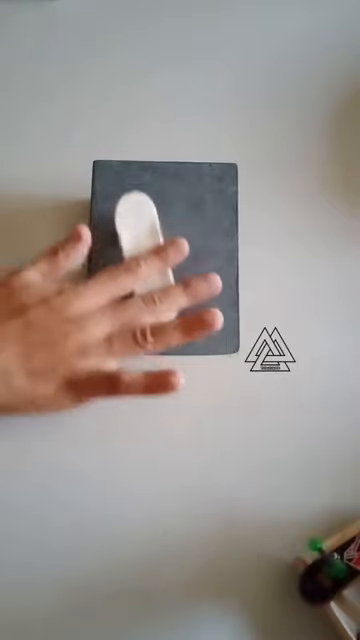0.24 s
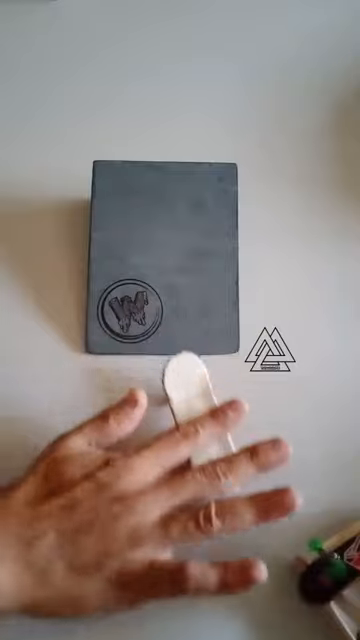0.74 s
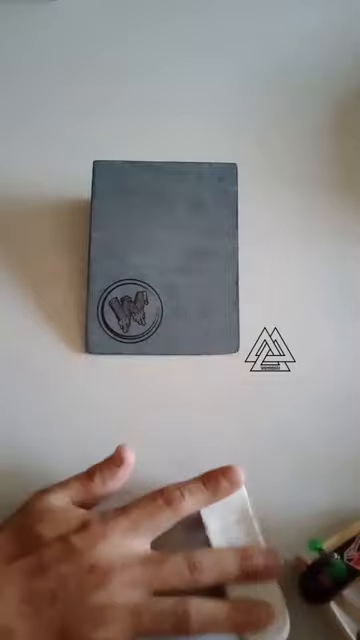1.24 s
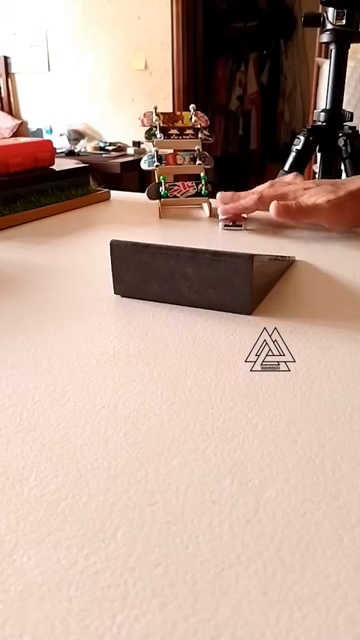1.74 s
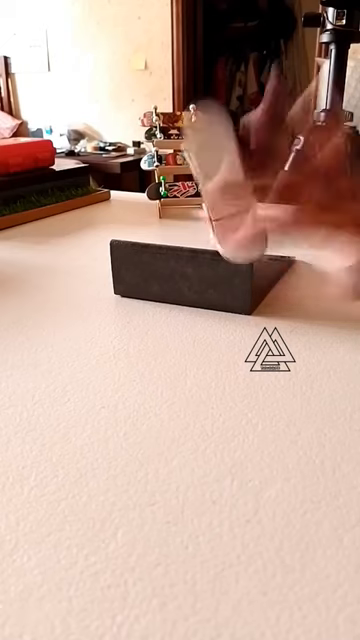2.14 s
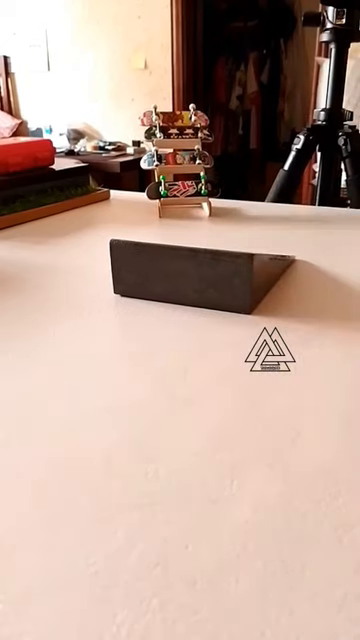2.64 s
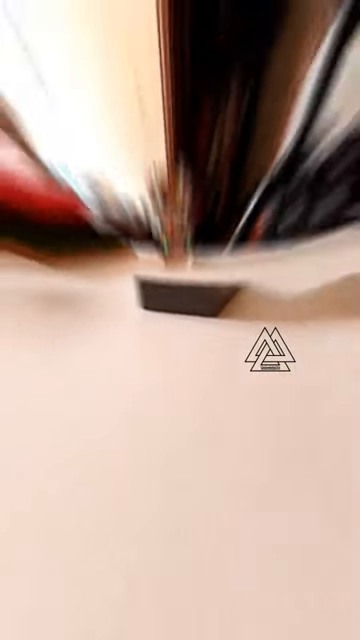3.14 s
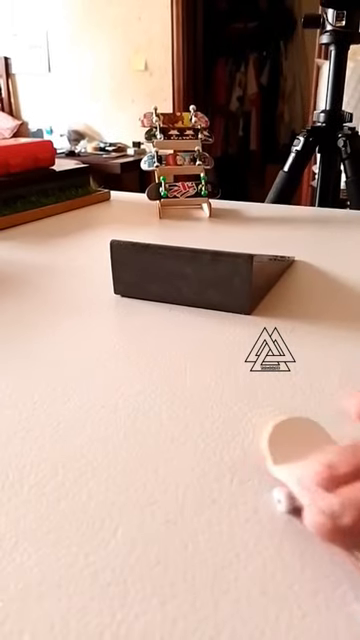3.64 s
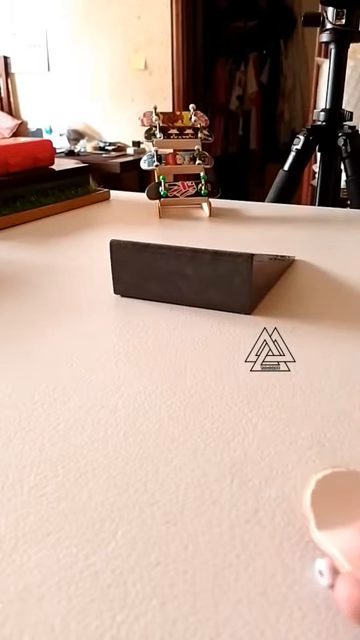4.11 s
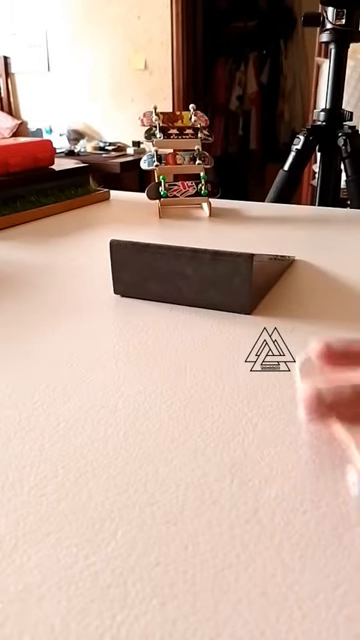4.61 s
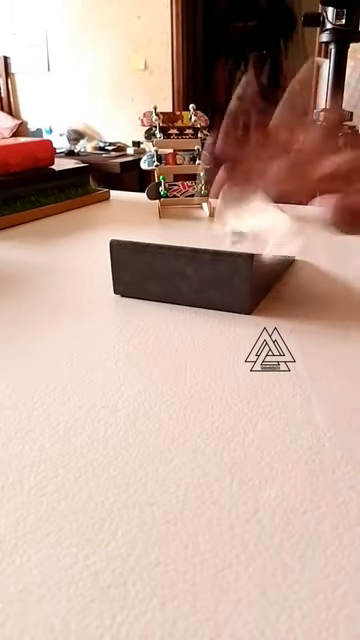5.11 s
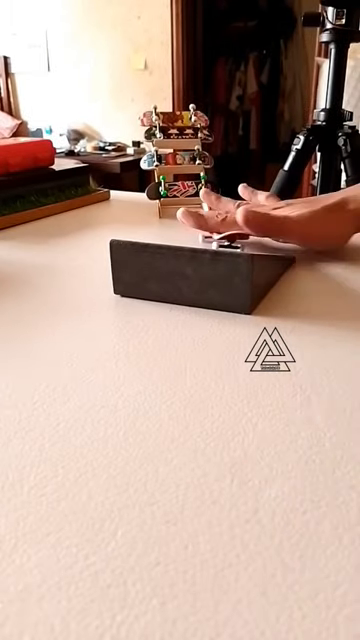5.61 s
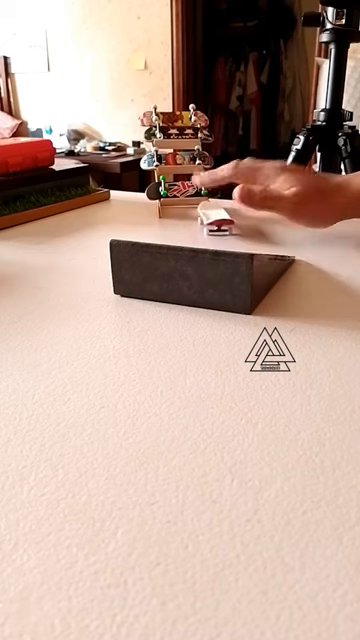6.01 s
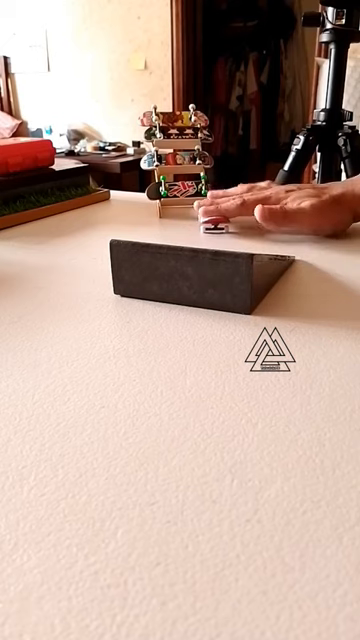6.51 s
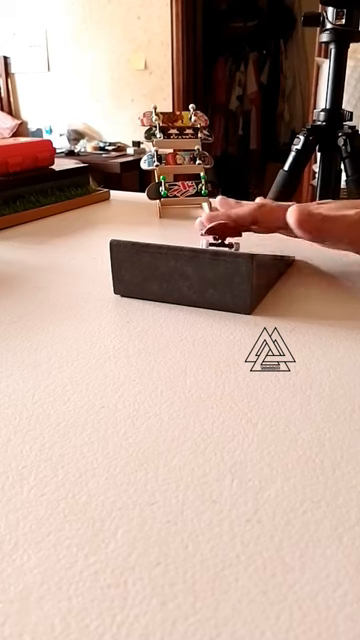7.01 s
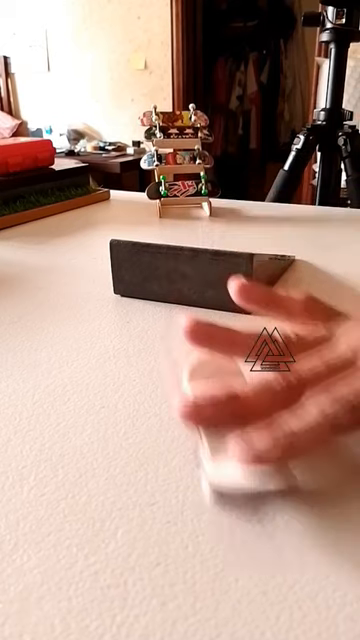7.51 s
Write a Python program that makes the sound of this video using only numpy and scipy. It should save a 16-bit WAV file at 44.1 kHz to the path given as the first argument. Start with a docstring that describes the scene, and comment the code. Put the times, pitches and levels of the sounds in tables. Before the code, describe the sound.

A toy finger skateboard clacks off a small ramp with gritty scuffing, then duller and farther, rolls, pops and lands hard on a hollow table.

```python
"""A toy skateboard under two fingers, on a hollow table with a small ramp, in a quiet furnished room.
First, close, bright and from above, it drops onto the ramp and rolls off while fingers scuff the grip tape.
Then, from the table edge through a duller microphone over the room hush, it rolls, pops, lands and bounces.
Principle: source and resonator. Noise forces of rolling and short contact pushes excite damped modes of
table, deck, trucks and the other parts; skids add fuzzy tones, and the room adds a decaying answer."""
import sys
import numpy as np
from scipy import signal
from scipy.fft import rfft, irfft, next_fast_len
from scipy.io import wavfile
from scipy.ndimage import uniform_filter1d, map_coordinates

SR = 44100
rng = np.random.default_rng(int(sys.argv[2]) if len(sys.argv) > 2 else 0)


def log_audio(samples):
    """Write samples as a 16-bit WAV file to the path given in sys.argv[1]."""
    # one column per channel
    frames = np.atleast_2d(samples).T
    # limit to full scale, then quantise
    limited = np.clip(frames, -1, 1)
    pcm = np.round(limited * 32767).astype(np.int16)
    wavfile.write(sys.argv[1], SR, pcm)


N = 342024

# Room hush spectrum, relative: [f/Hz, density level/dB]
HUSH_SPECTRUM = [(15, -27), (25, -9), (33, -17.5), (88, -16), (199, -15), (382, -13), (464, -12),
                 (682, -15.5), (828, -12.5), (980, -14), (1480, -14), (6280, -28.5), (8000, -43.5),
                 (10400, -79), (17600, -120)]
# Hush over time, dipping and then stepping up near 3.05 s: [t/s, level/dB]
HUSH_LEVEL = [(1.47, -62), (2.5, -65), (2.8, -65), (3.02, -65.5), (3.08, -61), (7.76, -62)]
# Reverberation time of the room: [f/Hz, t60/s]
ROOM_DECAY = [(150, 0.083), (1000, 0.066), (3000, 0.074), (8000, 0.085)]
# Treble dip of the close microphone: (f/Hz, floor width/Hz, mouth width/Hz)
PORT_DIP = (9970, 1700, 7760)

# Modes of each part, relative within the part: [f/Hz, width/Hz, level/dB]
PARTS_ABOVE = dict( trucks=[(3523, 970, -1), (3800, 810, 1), (4294, 170, -1)], table=[(130, 76, 3),
               (284.6, 220, 2.5)], top=[(635, 110, 17.5), (820, 630, -14)], ramp=[(1141, 100, 0.5),
               (1500, 200, -13)], deck=[(1950, 520, -0.5), (2455, 1100, 0.5), (2920, 760, -1)],
               scuff=[(5300, 1200, 9.5), (6500, 1500, 12.5), (8050, 6200, 1.5), (14000, 4200, -17)])
PARTS_EDGE = dict( trucks=[(3410, 300, 1.5), (4260, 1640, -3), (5340, 1080, -2), (6556, 780, -8.5)],
              table=[(174, 247, -5), (390, 80, 2), (501, 129, -0.5)], deck=[(845, 199, 1), (1135, 180, -2),
              (1416, 575, -3.5)], wheels=[(1915, 374, -1.5), (2323, 134, 3), (2686, 790, -2.5)])
# The whole table rocking on its legs, moved by blows only: [f/Hz, width/Hz, level/dB]
LEG_MODES = [(61, 37, 0)]

# Fingers scuffing over the grip tape: [t/s, level/dB, fall t60/s]
SCUFFS = [(-.02, -35, .3), (.122, -35.5, .5), (.23, -44, .2), (.425, -55, .3), (.52, -46.5, .4),
          (.66, -52.5, .5), (.89, -42.5, .25), (1.276, -40, .4)]
# Skids of tail and wheels around pops and landings: [t/s, rise/s, hold/s, fall t60/s, singing f/Hz,
# level/dB, then over the level: weight on the table/dB, rattle of the trucks/dB, singing/dB]
SKIDS = [(2.363, 0.035, 0.0095, 0.084, 450, -44, 6, -5, -14),
         (2.524, .03, 0.013, 0.12, 778, -22.5, -10.5, -9.5, -4),
         (2.595, 0.017, 0.0097, 0.035, 2310, -30, -1.5, -14, -13.5),
         (2.638, 0.014, 0.012, 0.091, 2350, -25, -11, -17, -21),
         (2.686, 0.02, 0.022, 0.037, 800, -35, -24, -0.5, 1),
         (2.752, 0.0087, 0.014, .024, 794, -43.5, -4.5, -7, 4.5),
         (3.364, 0.0075, 0.024, 0.16, 1385, -49.5, -4.5, -13, -1.5),
         (3.415, 0.027, 0.016, 0.12, 1356, -39, -4.5, -21, -20),
         (3.493, 0.0045, 0.017, .095, 3290, -38.5, -9, -13, -5),
         (3.537, 0.0077, 0.031, 0.19, 3010, -49, -3.5, -8, 3),
         (3.636, .009, 0.013, 0.15, 821, -40, -13.5, -16, -6),
         (5.226, 0.02, .004, .14, 329, -29, -2, -7.5, -4.5),
         (5.356, 0.0065, 0.0063, 0.11, 1598, -46.5, 0, 0, 2),
         (5.401, 0.037, 0.021, 0.24, 1157, -38, -5.5, 0.5, -2.5),
         (7.325, 0.077, 0.012, 0.24, 1185, -47, -7.5, -6.5, -9),
         (7.636, 0.0062, 0.022, 0.16, 697, -21.5, -9.5, -6, -2),
         (7.667, 0.0045, 0.033, 0.47, 3700, -41.5, -1.5, -1, 3)]
# Shares of a skid over its level: trucks, table, deck, wheels [level/dB]
SKID_SHARES = [0.5, 2, -1.5, -2.5]

# Rolling from above: [t/s, level/dB, weight on the table over the level/dB, lean of deck over trucks/dB]
ROLL_ABOVE = [(0, -24.5, -10.5, -8), (0.03, -40, 2.5, -3), (.06, -49.5, 2, -3), (.084, -36, 1, 3),
              (.116, -42.5, -2.5, -2.5), (.16, -36.5, -5.5, -13), (0.24, -34, -14, 1), (.286, -52, -11, 0),
              (.402, -48.5, -15.5, 1), (.428, -41.5, -11, -7.5), (.506, -47, -3.5, 8),
              (.542, -38, -10.5, 13), (.625, -45, -5, -1), (0.673, -39, -4.5, 0),
              (.721, -40.5, -12.5, -2.5), (.811, -50, -7.5, -3), (.85, -44, -16.5, -7),
              (.885, -39, -19, -7), (.909, -35, -21, 0), (1.0, -48.5, -14.5, 6.5), (1.04, -48.5, -17, 12),
              (1.075, -42, -24, -3), (1.113, -53.5, -21, 2), (1.16, -57, -14, -3.5),
              (1.18, -44.5, -28, -17), (1.266, -56, -12.5, 0), (1.306, -54, -18, -8),
              (1.394, -54, -21.5, -6.5), (1.45, -43, -13.5, -1.5), (1.465, -46.5, -6, -5)]
# The hollow ramp's ring, weaker off the ramp, with one late swell: [t/s, level/dB]
RAMP_RING = [(0, -37.5), (.055, -52.5), (.07, -48), (.12, -44.5), (.16, -30.5), (.29, -48.5), (.54, -46.5),
             (.72, -52), (.82, -64), (.9, -48), (1.0, -60), (1.465, -62)]
# Table top over the table: (on the ramp, off the ramp) [level/dB]
TABLE_TOP_DB = (-29.5, 0.5)
# Rolling and sliding at the edge, one list a stroke:
# [t/s, level/dB, then over the level: weight on the table/dB, rattle of the trucks/dB]
ROLL_EDGE = [
    [(2.03, -76.5, 6, -12), (2.054, -61, 0.5, -2.5), (2.076, -48, 1.5, -14), (2.104, -49.5, 2, -11),
     (2.158, -40, -8, -8.5), (2.18, -43.5, -11, -2), (2.202, -54.5, -2, -3), (2.248, -52.5, -2.5, -8.5),
     (2.36, -67, -3, -7)],
    [(3.73, -57.5, -6.5, -14), (3.842, -68, -10, -19), (3.862, -52, -16, -13), (3.904, -66.5, -8, -8),
     (3.954, -52.5, -9.5, -6), (4.078, -73, -8, -11), (4.146, -49, -10, -10), (4.268, -73.5, 2, -8),
     (4.3, -62.5, -14, 0)],
    [(4.4, -76, 1, -7.5), (4.554, -50, -13.5, -12.5), (4.614, -48.5, -16, -14), (4.724, -48.5, -3, -30),
     (4.75, -50.5, -4.5, -2.5), (4.88, -43, -7, -14.5), (5.094, -50.5, -2.5, -12), (5.178, -67, 6, -11),
     (5.22, -69.5, -5, -1.5)],
    [(5.5, -66, -19, -7), (5.602, -61, 1.5, -3.5), (5.766, -50, -2.5, -17), (5.8, -63.5, 3.5, -4.5),
     (5.972, -47, -1, -13), (6.038, -58, 1, -15), (6.23, -60.5, -8.5, -13.5), (6.356, -62.5, 1.5, -6.5),
     (6.38, -69, -3.5, -5.5)],
    [(6.8, -64, -16.5, -8.5), (6.858, -68.5, 0, -3.5), (6.904, -54.5, 2, -7.5), (6.916, -45.5, -7.5, -15),
     (7.086, -50.5, 1, -8), (7.11, -60, 4.5, -3), (7.168, -49, -0.5, -9), (7.242, -62.5, -2, -5),
     (7.34, -59.5, 1.5, -2.5)],
]
# Shares of the rolling over its level: trucks, table, deck, wheels [level/dB]
ROLL_EDGE_SHARES = [-4, -0.5, -3, -6.5]

# Contacts from above, relative: [t/s, strength/dB, table/dB, ramp/dB, favoured f/Hz, contact t60/s]
HITS_ABOVE = [(0.072, -11.5, -38, -20.5, 4420, 0.009), (0.1228, 0, -35, -11, 3160, 0.01),
              (0.1433, -11.5, -53, -16, 1970, 0.009), (0.1502, -13.5, -43, -26, 4080, 0.009),
              (0.2335, -22, -47, -36, 4200, 0.009), (0.3247, -31, -45, -46, 3900, 0.027),
              (0.3633, -30, -57, -44, 2600, 0.02), (0.4301, -42, -52, -35, 1950, 0.012),
              (0.6379, -14.5, -50, -54, 3500, 0.015), (0.653, -20.5, -48, -51, 3500, 0.009),
              (0.666, -22.5, -49, -31.5, 1970, 0.014), (0.7093, -30, -56, -45, 3920, 0.009),
              (0.803, -33, -52, -51, 3740, 0.009), (0.8718, -20.5, -56, -41, 3800, 0.009),
              (1.061, -25.5, -55, -47, 3450, 0.009), (1.1682, -29, -75, -63, 3840, 0.014),
              (1.1938, -50, -64, -56, 3910, 0.009), (1.2151, -34.5, -61, -59, 3860, 0.009),
              (1.4192, -34, -68.5, -52, 3750, 0.013), (1.4507, -30, -62.5, -43, 3700, 0.01)]
# Contacts at the edge, relative: [t/s, strength/dB, table/dB, deck/dB, favoured f/Hz, contact t60/s]
HITS_EDGE = [(2.074, -46, -46, -44, 3770, 0.013), (2.4104, -46, -41.5, -39, 2030, 0.014),
             (2.5577, -10.5, -14.5, -14.5, 2230, 0.027), (2.6148, -5.5, -28, -20.5, 2380, 0.014),
             (2.6534, -6.5, -44, -12.5, 2520, 0.033), (2.6694, -17, -41, -38, 2200, 0.011),
             (2.684, -22, -43, -22.5, 2200, 0.016), (2.6978, -10, -42, -17.5, 2820, 0.019),
             (2.7594, -19, -39, -26.5, 2160, 0.017), (2.8681, -45.5, -71, -65.5, 3920, 0.021),
             (3.3571, -14, -38, -24, 1870, 0.035), (3.3614, -22, -51, -26.5, 1900, 0.034),
             (3.4401, -24, -49, -25, 3280, 0.021), (3.465, -32, -49, -30, 4520, 0.019),
             (3.4997, -20, -50, -31.5, 3100, 0.019), (3.516, -31, -43, -31, 3380, 0.027),
             (3.552, -24, -45, -35, 3330, 0.01), (3.5685, -25, -56, -43, 2620, 0.013),
             (3.5971, -29, -58, -49, 2630, 0.014), (3.6436, -24, -52, -46, 2660, 0.033),
             (3.6571, -19, -43.5, -29.5, 1920, 0.016), (3.719, -44, -54, -45, 2380, 0.029),
             (3.7793, -36.5, -63, -55, 1850, 0.023), (3.8635, -35, -63, -49, 1900, 0.018),
             (3.9779, -43, -59, -59, 2690, 0.016), (4.1391, -40.5, -62, -53, 2870, 0.016),
             (4.1848, -40, -59, -71, 2720, 0.016), (4.5087, -48.5, -62.5, -50.5, 4220, 0.016),
             (4.5336, -39.5, -74, -45, 4320, 0.039), (4.5565, -35, -62, -44, 2050, 0.016),
             (4.591, -40.5, -63, -58, 2700, 0.016), (5.0174, -47, -46, -51, 2140, 0.016),
             (5.246, -17.5, -22.5, -19.5, 2490, 0.028), (5.363, -38.5, -47, -43, 3770, 0.021),
             (5.4104, -25.5, -45, -35, 2020, 0.019), (5.4229, -22.5, -41, -34, 4900, 0.012),
             (5.44, -15, -26, -26, 3650, 0.014), (5.4552, -29, -43, -41, 4040, 0.028),
             (5.9252, -29, -45, -42, 1710, 0.024), (6.3934, -46, -45.5, -50, 2230, 0.032),
             (6.9154, -46, -53, -47.5, 1820, 0.016), (7.0733, -36.5, -45, -50, 2360, 0.019),
             (7.3675, -41.5, -51, -61, 3630, 0.018), (7.6401, -13, -11.5, -9.5, 3700, 0.023),
             (7.646, -4, -15, -15, 2660, 0.048), (7.6604, -23, -12.5, -10.5, 3430, 0.022),
             (7.6791, -9.5, -23, -21, 3480, 0.033)]
# Small parts struck, trucks then deck: [own f/Hz, level over the strength/dB]
SMALL_ABOVE = [(3770, -1), (2400, 0)]
# Small parts struck, trucks then wheels: [own f/Hz, level over the strength/dB]
SMALL_EDGE = [(3990, 0), (2448, -2)]

CUT_S = 1.465  # the view from above ends here
OFF_RAMP_S = 0.65  # the wheels leave the ramp for the table top
EDGE_HZ = 7890  # the duller microphone is 50 dB or more down above this
TOP_HZ = 15700  # band limit of the whole sound
FULL = 0.74  # amplitude ceiling of the preamplifier
SCUFF_RISE_S, SIZZLE_DB = 0.015, -26.5  # the sizzle level is taken over the scuff
SCUFF_DB = -14.5  # steady scuff over the rolling level
NEAR_ABOVE_DB, NEAR_EDGE_DB = 23.5, 14.5  # loss per octave between own and favoured pitch
CRACK_DB, CRACK_GROWS = -12.5, 1.55  # the grip-tape crack grows faster than the blow, dB per dB


def amp(db):
    """Amplitude ratio of a level: 20 dB for each factor of ten."""
    return 10 ** (np.asarray(db) / 20)


def unit(x):
    """Normalisation to unit rms."""
    return x / np.sqrt(np.mean(np.abs(x) ** 2) + 1e-20)


def along(points, hz):
    """Interpolation of (f, value) points on a logarithmic frequency axis."""
    f, value = np.transpose(points)
    return np.interp(np.log(hz + 1), np.log(f + 1), value)


def gains(rows):
    """Envelopes linear in dB, one for each level column; practically silent outside the rows."""
    s, *columns = np.transpose(rows)
    t = np.arange(N) / SR
    return np.array([amp(np.interp(t, s, column, -200, -200)) for column in columns])


def swell(s, rise, hold, t60):
    """Squared rise, hold, then exponential decay."""
    t = np.arange(N) / SR - s
    attack = np.clip(t / rise, 0, 1) ** 2
    return attack * amp(-60 * np.maximum(t - rise - hold, 0) / t60)


def wobble(rate):
    """Smooth random curve: interpolated Gaussian knots, rate of them a second."""
    knots = rng.standard_normal(int(N * rate / SR) + 4)
    return map_coordinates(knots, [np.arange(N) * rate / SR])


def filtered(x, response):
    """Linear filtering: the spectrum times a response of frequency."""
    size = next_fast_len(N + SR // 2)
    f = np.fft.rfftfreq(size, 1 / SR)
    return irfft(rfft(x, size) * response(f), size)[..., :N]


def resonance(f, hz, width):
    """Damped oscillator: one mode with gain 1 at its centre."""
    return 1j * f * width / (hz * hz - f * f + 1j * f * width)


def ringing(modes, f):
    """Modal superposition with alternating signs, steep skirts outside the modes and unit rms gain."""
    peaks = sum((-1) ** k * amp(db) * resonance(f, hz, width) for k, (hz, width, db) in enumerate(modes))
    low = 1j * f / (0.75 * modes[0][0])
    high = 1j * f / (1.3 * modes[-1][0])
    highpass = low ** 2 / (1 + np.sqrt(2) * low + low ** 2)
    lowpass = 1 / (1 + np.sqrt(2) * high + high ** 2)
    return unit(peaks * highpass * lowpass)


def room_hush():
    """Coloured noise: white noise shaped by the hush spectrum; its level dips, then steps up near 3.05 s."""
    noise = filtered(rng.standard_normal(N), lambda hz: amp(along(HUSH_SPECTRUM, hz)))
    return gains(HUSH_LEVEL)[0] * unit(noise)


def room(x):
    """Diffuse reverberation: each frequency of the room's noise-like answer decays at its own speed."""
    hz, t, z = signal.stft(rng.standard_normal(SR // 2), SR, nperseg=256)
    decay = amp(-60 * t / along(ROOM_DECAY, hz)[:, None])
    tail = signal.istft(z * decay, SR, nperseg=256)[1]
    delayed = np.pad(x, (250, 0))  # samples before the answer begins
    return signal.fftconvolve(delayed, tail / np.linalg.norm(tail))[:N]


def treble_dip(f):
    """Double notch: a narrow resonance divided by a wide one dims the close microphone's treble."""
    c, floor, mouth = PORT_DIP
    notch = (c * c - f * f + 1j * f * floor) / (c * c - f * f + 1j * f * mouth)
    return notch ** 2


def overload(x):
    """Soft saturation: the preamplifier rounds off the hardest landings."""
    return x / (1 + np.abs(x / FULL) ** 6) ** (1 / 6)


def patchy(x, depth_db):
    """Time-varying filtering: a random gain over time and frequency makes the colour drift."""
    hz, _, z = signal.stft(x, SR, nperseg=512)
    depth_db = depth_db * np.clip(hz / 2600, 0.3, 1)[:, None]  # shallower shifts at low frequencies
    field = uniform_filter1d(rng.standard_normal(z.shape), 5, 0)  # smooth over frequency
    field = unit(uniform_filter1d(field, 9, 1))  # smooth over time
    return signal.istft(z * amp(depth_db * field), nperseg=512)[1][:N]


def scuffing():
    """Friction: finger strokes on the grip tape rise fast and decay exponentially."""
    return sum(amp(db) * swell(s, SCUFF_RISE_S, 0, t60) for s, db, t60 in SCUFFS)


def sizzle(scuff_pressure):
    """Friction noise: faint resonances at the very top follow the scuff pressure."""
    noise = patchy(rng.standard_normal(N), 3.5)
    modes = [(12600, 1300, 0.0026), (14600, 1600, 0.0023)]
    return amp(SIZZLE_DB) * scuff_pressure * filtered(noise, lambda hz: ringing(modes, hz))


def spread(rows, share_db):
    """Load sharing: (t, level, weight, rattle) rows become (t, trucks, table, deck, wheels)."""
    s, level, weight, rattle = np.transpose(rows)
    on_table = np.outer(weight, [0, 1, 0, 0])
    on_trucks = np.outer(rattle, [1, 0, 0, 0])
    return np.column_stack([s, level[:, None] + share_db + on_table + on_trucks])


def skidding():
    """Sliding friction: each skid gives a pressure on every part and a tone blurred by random modulation."""
    t, pressure, singing = np.arange(N) / SR, 0, 0
    fuzz = unit(wobble(170) + 1j * wobble(170))
    for s, rise, hold, t60, hz, db, weight, rattle, sing_db in SKIDS:
        shape = swell(s, rise, hold, t60)
        parts_db = spread([(s, db, weight, rattle)], SKID_SHARES)[0, 1:]
        pressure = pressure + amp(parts_db)[:, None] * shape
        blur = fuzz[(t * SR * hz / 1000).astype(int) % N]  # higher tones are wider
        tone = np.sqrt(2) * np.real(blur * np.exp(2j * np.pi * hz * t))
        singing = singing + amp(db + sing_db) * shape * tone
    return pressure, singing


def tread(count, bumpy_db, grit_rate, grit_db):
    """Roughness excitation: uneven noise for each part plus specks of grit common to all."""
    bumps = amp(bumpy_db * (wobble(45) + wobble(130)))
    specks = rng.random(N) < grit_rate / SR  # grit_rate is per second
    grit = specks * amp(grit_db + 4.86 * np.minimum(rng.exponential(size=N), 3))
    return np.array([unit(bumps * rng.standard_normal(N) + grit) for _ in range(count)])


def leaning(db, lean_db):
    """Power division: one level is split between trucks and deck."""
    trucks = db - 10 * np.log10(1 + amp(lean_db) ** 2)
    return trucks, trucks + lean_db


def nearness(db, hz, small, near_db):
    """Selective excitation: a small part rings less the farther its pitch is from the favoured one."""
    return [db + over - near_db * abs(np.log2(hz / own_hz)) for own_hz, over in small]


def parts_above(s, trucks, table, ramp, deck, scuff):
    """Coupling: the table top answers fully only once the board is off the ramp."""
    top = table + TABLE_TOP_DB[int(s > OFF_RAMP_S)]
    return (s, trucks, table, top, ramp, deck, scuff)


def blows(rows, parts, thud_db):
    """Impact excitation: a quick push with dying chatter rings every part and favours one pitch."""
    size = 8192
    t, f = np.arange(size) / SR, np.fft.rfftfreq(size, 1 / SR)
    rings = np.array([ringing(modes, f) for modes in [*parts.values(), LEG_MODES]])
    sound = np.zeros(N + size)
    for s, *parts_db, hz, t60 in rows:
        decay = amp(-60 * t / max(t60, 0.002))
        chatter = rng.standard_normal(size) * decay * (1 - np.exp(-t / 0.00071))
        chatter[:6] += 3 * np.hanning(6)  # the first touch
        favoured = 1 + 3 * resonance(f, hz, 0.11 * hz)
        rung = irfft(rfft(chatter) * favoured * rings, size)
        rung /= np.linalg.norm(rung, axis=1)[:, None]
        levels_db = np.append(parts_db, parts_db[1] + thud_db)  # the legs follow the table
        start = round(s * SR)
        sound[start:start + size] += amp(levels_db + 18) @ rung
    return sound[:N]


def board(parts, roll, hits, patchy_db, thud_db):
    """Forced and free vibration: rolling and contact forces ring each part of the set-up."""
    rolled = sum(filtered(force, lambda hz: ringing(modes, hz)) for force, modes in zip(roll, parts.values()))
    return patchy(rolled, patchy_db) + blows(hits, parts, thud_db)


def from_above():
    """Near field: the close, bright view of the ramp, with little room in it, until the cut."""
    rows, hits = [], []
    for s, db, weight, lean_db in ROLL_ABOVE:
        trucks, deck = leaning(db, lean_db)
        rows.append(parts_above(s, trucks, db + weight, 0, deck, db + SCUFF_DB))
    for s, db, table, ramp, hz, t60 in HITS_ABOVE:
        trucks, deck = nearness(db, hz, SMALL_ABOVE, NEAR_ABOVE_DB)
        crack = CRACK_DB + CRACK_GROWS * db
        hits.append((*parts_above(s, trucks, table, ramp, deck, crack), hz, t60))
    pressure = gains(rows)
    pressure[3] = gains(RAMP_RING)[0]  # takes the place of the empty ramp column
    pressure[5] += scuffing()
    roll = pressure * tread(count=6, bumpy_db=0.8, grit_rate=160, grit_db=11.0)
    near = board(PARTS_ABOVE, roll, hits, patchy_db=4.0, thud_db=-4)
    heard = near + amp(-15.5) * room(near) + sizzle(pressure[5])
    return overload(filtered(heard, treble_dip)) * (np.arange(N) < CUT_S * SR)


def from_edge():
    """Low-pass pickup: the table-level view over the hush, with a small negative offset later on."""
    skid_pressure, singing = skidding()
    pressure = sum(gains(spread(rows, ROLL_EDGE_SHARES)) for rows in ROLL_EDGE) + skid_pressure
    hits = []
    for s, db, table, deck, hz, t60 in HITS_EDGE:
        trucks, wheels = nearness(db, hz, SMALL_EDGE, NEAR_EDGE_DB)
        hits.append((s, trucks, table, deck, wheels, hz, t60))
    roll = pressure * tread(count=4, bumpy_db=2.4, grit_rate=260, grit_db=13.5)
    near = board(PARTS_EDGE, roll, hits, patchy_db=2.5, thud_db=-19.5) + singing
    heard = near + amp(-14.0) * room(near) + room_hush()
    microphone = signal.cheby2(14, 50, EDGE_HZ, fs=SR, output="sos")
    offset = -amp(-58.5) * (np.arange(N) > 3.05 * SR)
    return overload(signal.sosfilt(microphone, heard)) + offset


def scene():
    """Superposition: the view from above, then the view from the edge, on one channel."""
    return (from_above() + from_edge())[None]


def record(dry):
    """Band limitation: a faint converter hiss is added and nothing is kept above the limit."""
    hiss = amp(-92.5) * rng.standard_normal(N)
    return filtered(dry + hiss, lambda hz: hz < TOP_HZ)


dry = scene()
out = record(dry)
log_audio(out)
```